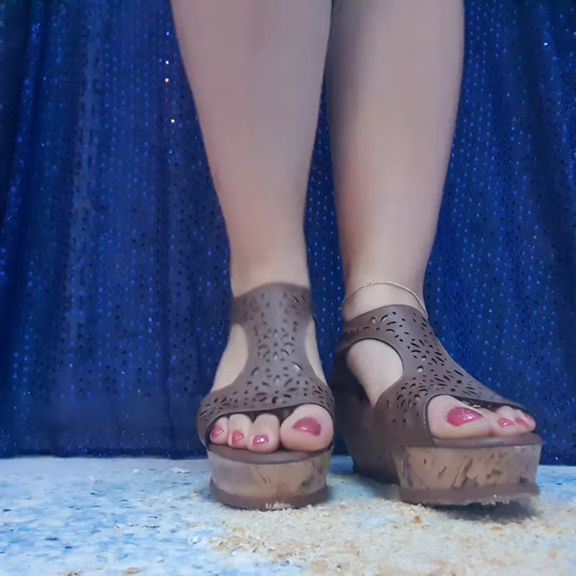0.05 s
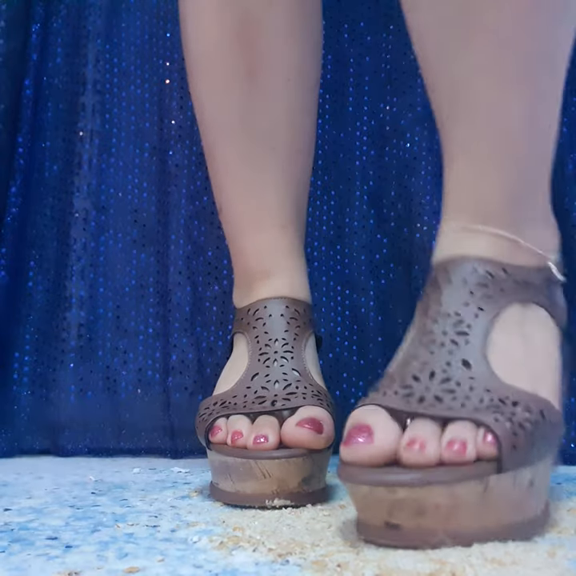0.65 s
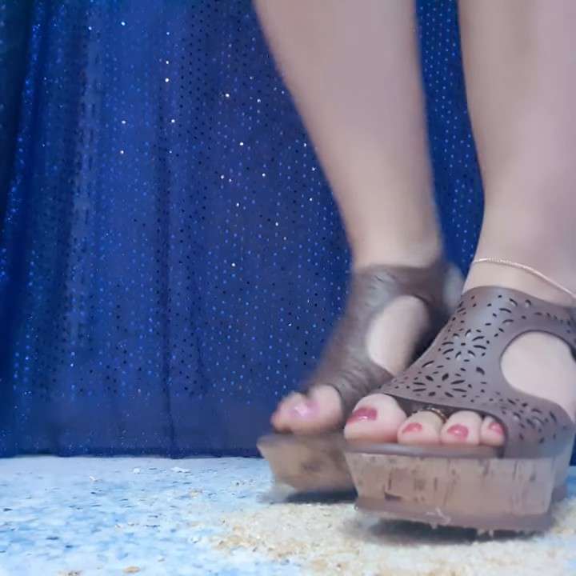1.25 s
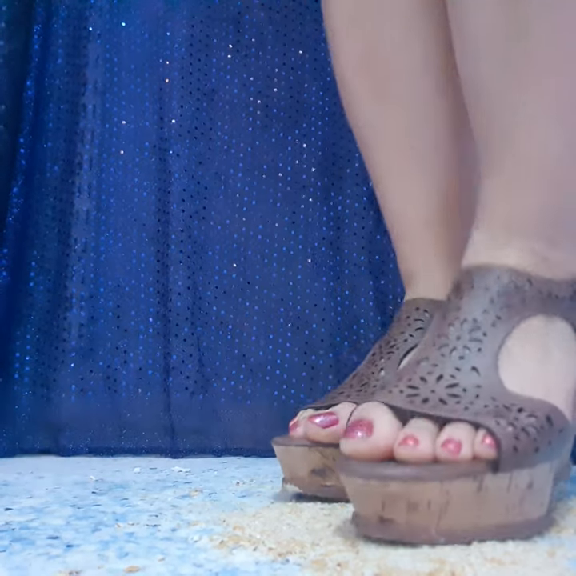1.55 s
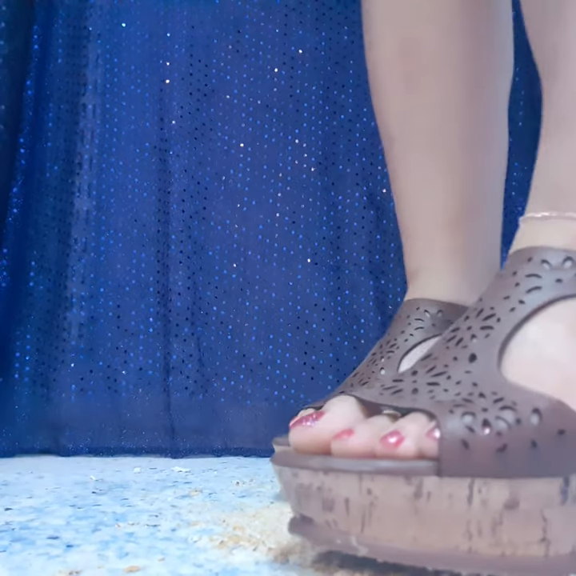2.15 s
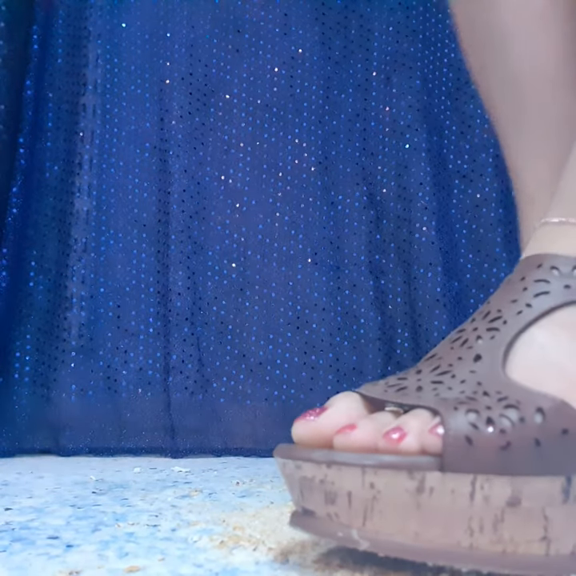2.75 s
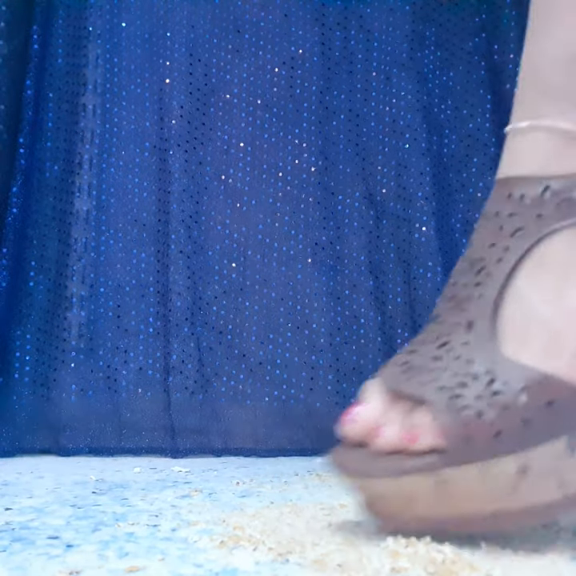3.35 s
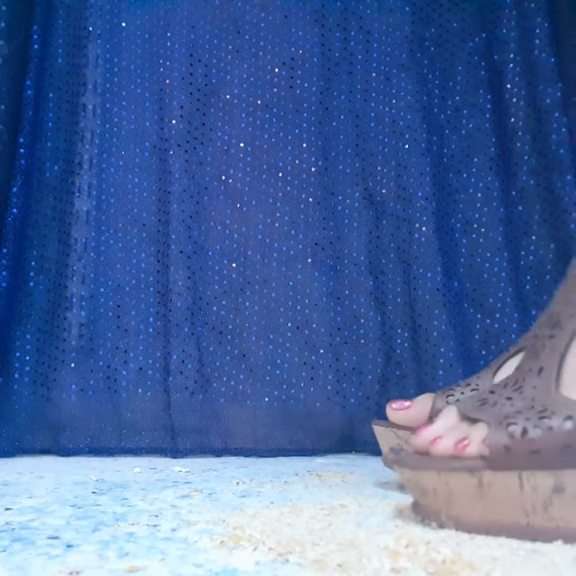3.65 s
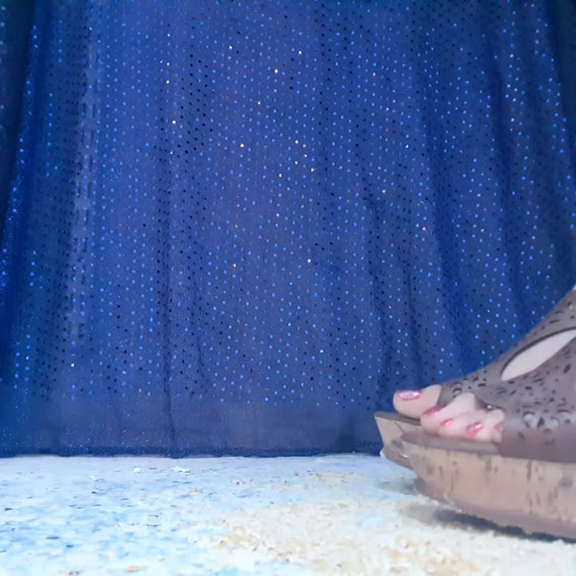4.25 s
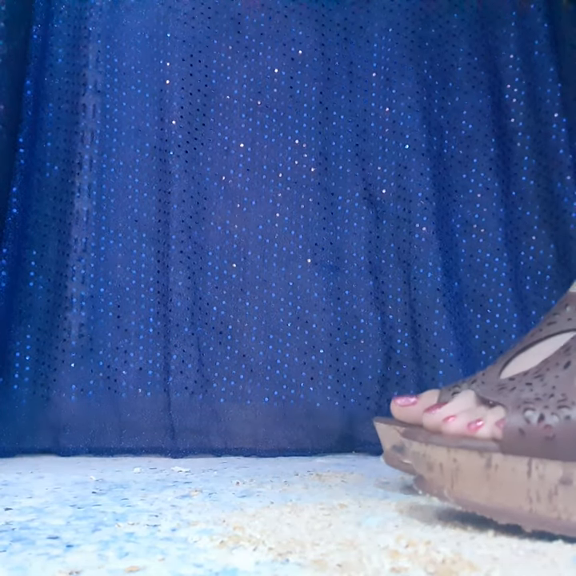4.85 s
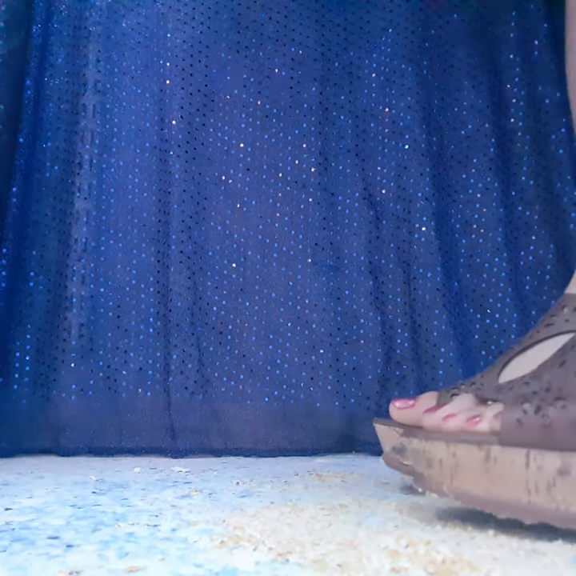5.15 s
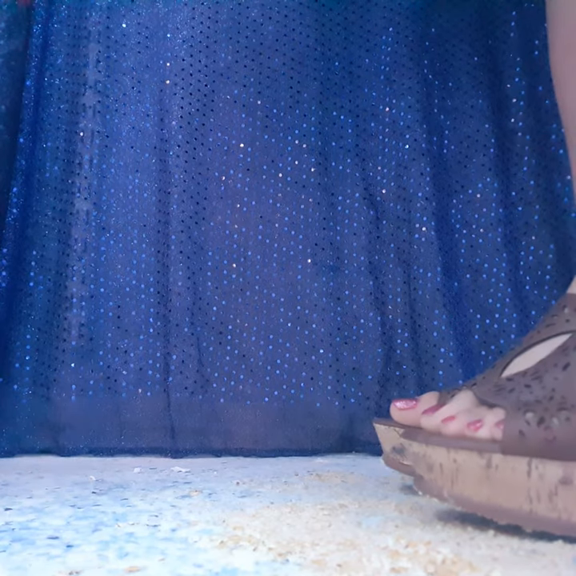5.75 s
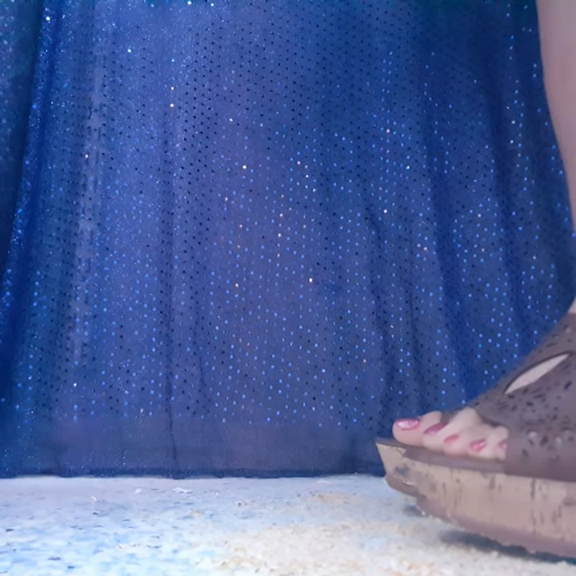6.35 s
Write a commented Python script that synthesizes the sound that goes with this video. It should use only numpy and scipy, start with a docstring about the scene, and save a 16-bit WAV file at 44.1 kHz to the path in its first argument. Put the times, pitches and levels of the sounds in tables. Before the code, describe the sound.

Brittle snack pieces crackle and snap in uneven bursts as thick sandal soles press down on them, close to the microphone in a small room. The crunching thins into a powdery grinding and a few quiet scrapes and taps. Something then brushes the microphone on the left and knocks it with one loud, hollow thump. A faint, low motor hum continues underneath.

```python
"""Dry pretzel pieces scrape and crunch under wedge sandals on a hard floor, close by, in a small
curtained room. Each step lands with a soft thud, crushes a mass of crumbs (thousands of tiny clicks)
and snaps a few larger pieces; then one sole grinds slowly and shuffles to rest.
Near the end something brushes and bumps the left side of the microphone, making its housing boom.
A motor somewhere in the house hums low underneath it all."""
import sys
import numpy as np
from scipy import signal
from scipy.fft import rfft, irfft, next_fast_len
from scipy.io import wavfile

SR = 44100
rng = np.random.default_rng(int(sys.argv[2]) if len(sys.argv) > 2 else 0)


def waveform_to_disk(signal):
    """Save audio, clipped to [-1, 1], as 16-bit WAV at the path in sys.argv[1]."""
    frames = np.transpose(np.atleast_2d(signal))
    scaled = np.clip(frames, -1, 1) * 32767
    samples = np.round(scaled).astype(np.int16)
    wavfile.write(sys.argv[1], SR, samples)


N = 282416
T = np.arange(N) / SR

# weight bearing down on the crumbs: t/s at full weight, level/dB, rise/s, hold/s, release/(dB per s),
# hollow share/dB, fizz share/dB
PRESSES = [(.01, -43, .05, 0.028, 99, -0.5, -4.5), (0.067, -29, 0.035, 0.016, 165, -3, -6.5),
           (0.236, -38, 0.16, 0.04, 108, -5.5, -3), (0.702, -32, 0.083, 0.3, 82, -8.5, -9),
           (.91, -43.5, 0.045, 0.067, 82, -7, -0.5), (1.017, -53, .04, 0.27, 66.5, 2, 6),
           (1.375, -36, 0.063, 0.011, 137, -2.5, -7.5), (1.537, -39, 0.25, 0.059, 116.5, -2.5, -6),
           (1.912, -35.5, 0.08, 0.091, 123, -4, -8), (2.12, -43.5, 0.19, 0.078, 95, -6.5, -4.5),
           (2.263, -40.5, 0.076, 0.091, 147, 0, 0.5), (2.722, -37.5, 0.052, .02, 60, -4, -3.5),
           (3.01, -43, 0.23, 0.018, 89, -4.5, -1.5), (3.194, -31.5, 0.082, 0.0032, 258, -6, -6.5),
           (3.29, -35.5, 0.07, 0.0064, 200, -2.5, -5.5), (3.66, -29, 0.11, 0.011, 156, -8, -5),
           (3.783, -35, 0.098, 0.057, 167, -6.5, -2.5), (3.954, -41.5, 0.091, 0.0093, 133, -4, -4),
           (4.046, -38, 0.033, 0.0077, 175, -3.5, -0.5), (4.164, -49.5, 0.15, 0.027, 85, 0, 1),
           (4.4, -48, 0.54, 0.075, 48, -15, -2.5), (4.59, -48, 0.58, 0.03, 32, -16.5, -2),
           (4.889, -54, 0.018, .02, 82, 1, -2), (5.112, -53, 0.26, 0.05, 90, -4.5, -2),
           (5.717, -68, 0.2, 0.025, 130, 0, 3)]
# tone of breaking crumbs: f/Hz, level/dB
CRUMB_COLOUR = [(88, -37), (150, -3.5), (249, -6), (315, -6), (422, -2.5), (745, -2.5), (854, -1.5),
                (1060, -5), (1870, -5), (3220, -5.5), (6260, -13), (7600, -15.5), (10200, -17.5),
                (12900, -16), (16000, -19.5)]
# dust hiss compared with the clicks, as the pieces are ground to powder: t/s, level/dB
DUST_SHARE = [(0, -8), (4.08, -8), (4.3, 5), (4.8, 4.5), (5.05, -2.5)]
# the largest pieces snapping: t/s, level/dB, body f/Hz, crust f/Hz, crust share/dB, left minus right/dB
BIG_SNAPS = [(0.056, -18.5, 2580, 6000, -10, 6), (0.0705, -10, 1710, 6000, 6, 0),
             (0.082, -16, 1710, 10500, -25, 5), (0.206, -24, 3400, 6000, 6, 4),
             (0.246, -16.5, 3400, 5200, -5, 6), (0.277, -20, 2800, 4500, -6, 2.5),
             (0.641, -21, 800, 5900, 23, 5), (0.696, -14.5, 2580, 5900, -1, 3),
             (0.7013, -14.5, 3400, 7000, -2, -2), (0.7075, -7.5, 2740, 5140, -6, -1),
             (0.7346, -7.0, 3370, 4500, -13, 1), (0.7572, -8, 2380, 4500, -7, 0),
             (0.7583, -14, 2100, 4500, -16, 3), (0.8553, -20.5, 3400, 4500, 4, 2),
             (0.8647, -15, 2580, 5200, -7, 0), (0.9105, -15, 3400, 4500, 10, 7),
             (1.0273, -19, 3400, 6100, 10, 0), (1.1638, -26.5, 2770, 5340, 17, -1),
             (1.309, -17.5, 2080, 6000, -6, 3), (1.3635, -28.0, 2410, 4500, 10, 6),
             (1.5097, -19.5, 3170, 10500, -4, 3), (1.5405, -26.5, 3400, 10500, -15, -0.5),
             (1.623, -18.5, 2580, 4500, 5, 4), (1.8727, -16.5, 2410, 6000, 0, 4),
             (1.922, -20, 3400, 5200, -2, 1.5), (1.9356, -4.5, 2800, 4500, -19, 3.5),
             (1.9404, -19.5, 3150, 7000, -3.5, 0), (2.0459, -21.5, 2240, 4470, -8, 5),
             (2.1264, -22.5, 3380, 7000, -7, 4), (2.1483, -17, 3400, 7000, -2, 1),
             (2.2553, -17, 1830, 6000, 5, 6), (2.2657, -10.5, 1830, 6950, 8, -5),
             (2.2963, -9.5, 1790, 4600, -1.5, 3.5), (2.3472, -14, 2250, 6000, 2.5, 1),
             (2.671, -25, 3400, 10600, 6, -1), (2.7341, -14.5, 910, 4440, 1, 6),
             (2.8438, -30, 1960, 8500, -12.5, 7), (3.1474, -17, 2360, 4450, -0.5, 5.5),
             (3.1913, -5.5, 2250, 5200, -0.5, 2), (3.1921, -12.5, 2070, 4470, -5, 1.5),
             (3.195, -5, 2370, 4500, 3.5, 2.5), (3.211, -15.5, 2250, 6000, 0, 0.5),
             (3.263, -15.5, 3420, 7000, -5.5, 1), (3.6204, -21, 2960, 6000, 7, -1),
             (3.6363, -11.5, 2560, 6000, 1.5, -3), (3.6534, 0.5, 2430, 5200, 4, 0),
             (3.6579, -9, 2740, 5200, 3, -3), (3.7761, -9.5, 2740, 6000, 3, -1),
             (3.7901, -27, 3400, 7000, 0, 8), (3.8096, -15.5, 2550, 4580, -1, -6),
             (3.8277, -16.5, 1710, 5230, 4, -6), (4.0436, -12.5, 800, 5900, 22, -8),
             (4.0541, -16.5, 3170, 5940, -1, 2), (4.0602, -9.5, 1570, 4500, 5, 0),
             (4.1646, -13.5, 1460, 7100, 5.5, -2.5), (4.805, -28.5, 2100, 7000, 12, -3),
             (5.0336, -35, 2100, 4500, -3, 8), (5.096, -19.5, 1470, 5100, -1, 2.5)]
# soles landing: t/s, thud level/dB, crushing level/dB
FOOTFALLS = [(.638, -28, -38), (1.306, -33, -38), (1.868, -24.5, -39.5), (2.669, -31.5, -42),
             (3.138, -38, -40.5), (3.263, -39.5, -51.5), (3.526, -41.5, -45.5)]
# light taps as the sole settles: t/s, level/dB
SOLE_TAPS = [(5.786, -42), (5.818, -53), (6.02, -54), (6.136, -46), (6.162, -53)]
# tones of the sole hitting the floor: f/Hz, time to fade 60 dB/s, level/dB
SOLE_MODES = [(115, 0.0617, -6.5), (208.4, 0.066, 4.5), (261, 0.12, -2), (375, 0.04, -4), (630, 0.034, -20)]
# a sole dragging over grit: start t/s, end t/s, first f/Hz, last f/Hz, width/Hz, level/dB
SCRAPES = [(0.013, 0.203, 895, 920, 320, -44.5), (0.182, 0.357, 940, 920, 327, -45.5),
           (.3, 0.563, 500, 425, 303, -57.5), (0.993, 1.305, 1600, 1730, 380, -57.5),
           (1.327, 1.468, 843, 815, 110, -42), (1.45, 1.953, 790, 730, 300, -62.5),
           (2.22, 2.36, 6200, 5940, 1100, -43.5), (2.706, 3.173, 815, 1210, 298, -49.5),
           (2.81, 3.1, 2200, 2480, 380, -55), (3.214, 3.412, 575, 435, 220, -45),
           (4.035, 4.105, 5800, 5600, 1800, -42), (4.293, 4.546, 3600, 3200, 2170, -54.5),
           (4.494, 4.655, 2140, 1940, 398, -50.5), (4.883, 4.923, 3770, 4030, 1590, -44),
           (4.91, 4.99, 3930, 3630, 1700, -56.5), (4.89, 5.3, 840, 730, 436, -59),
           (5.532, 5.635, 3900, 3800, 2420, -69.5), (5.646, 5.814, 3930, 3600, 1690, -65.5),
           (5.548, 5.802, 795, 648, 301, -71.5), (5.56, 5.8, 1585, 1420, 401, -73),
           (5.718, 5.8, 592, 567, 70, -60.5), (5.882, 5.901, 5700, 5570, 1090, -70.5),
           (6.023, 6.17, 3800, 3700, 1493, -70.5), (5.783, 5.828, 403, 380, 121, -59),
           (5.865, 5.92, 423, 410, 100.3, -62), (6.13, 6.166, 408, 369, 200, -59.5)]
# knocks on the microphone: t/s, housing level/dB, mount level/dB, tick level/dB
BUMPS = [(6.2683, 3.5, -8, -15), (6.2778, -5, -8, -15.5), (6.295, -9.5, -19, -38), (6.308, -22, -38, -36.5)]
# tones of the microphone's housing: f/Hz, time to fade 60 dB/s, level/dB
HOUSING_MODES = [(132, 0.11, -10), (188, 0.046, 14), (278, 0.118, -4), (400, 0.053, -33), (493, .05, -15.5)]
# tones of the whole case rocking on its mount: f/Hz, time to fade 60 dB/s, level/dB
MOUNT_MODES = [(79, 0.084, 7), (118, 0.052, -10), (415, 0.063, -21)]
# tone of the rub on the housing: f/Hz, level/dB
BRUSH_COLOUR = [(60, -18), (220, 9), (800, -10), (4300, -5.5), (7000, -24), (15000, -26)]
# the motor's tones: f/Hz, level/dB
HUM_TONES = [(87.5, -49.5), (64.2, -65.5), (102, -60), (51.6, -70.5), (26.5, -81), (154, -81.5)]
# slow rise and fall of the hum: t/s, level/dB
HUM_SWELL = [(0, -2), (1.1, -2.5), (1.55, -10), (1.95, -2), (2.6, -4), (3.0, 0), (3.5, -2), (3.95, 3),
             (4.2, -7), (4.5, 2.5), (6.2, -0.5)]
# tone of the still room: f/Hz, level/dB
ROOM_COLOUR = [(20, -19.5), (40, -5), (60, 7), (130, -4), (300, -7), (500, -18.5), (1200, -29), (2300, -38),
               (3500, -33.5), (5500, -31), (7500, -40.5), (15000, -40.5)]


def crunch(gains, hollow_db=-1, crackle_db=-.5, low_width=0.65, left_db=1.25):
    """The weight on the sole sets how loud the crumbs are; coarse ones sound hollow, fine ones fizz."""
    hollow_gain, crackle_gain, fizz_gain = gains
    grains = colour(crumbs(), CRUMB_COLOUR)
    low = band(grains, 170, 1415, order=3)
    low = low.mean(0) + low_width * (low - low.mean(0))  # long waves reach both sides much alike
    hollow = hollow_gain * undb(hollow_db) * unit(low)
    crackle = crackle_gain * undb(crackle_db) * unit(band(grains, 1148, 4720, order=3))
    fizz = fizz_gain * unit(band(grains, 4690, 21000, order=3))
    return (hollow + crackle + fizz) * pan(left_db)


def crumbs(per_s=2800, spread_db=3.5, largest_db=16, ring_db=8, pitches=16):
    """Countless tiny breaks, most of them weak, over a hiss of dust; each crumb size has its own pitch."""
    clicks = 0
    for hz in np.geomspace(700, 12000, pitches):
        breaks = rng.random(N) < per_s / pitches / SR
        strength = undb(np.minimum(spread_db * rng.exponential(size=N), largest_db))
        kicks = breaks * strength * rng.choice([-1, 1], N)
        path = path_from_sole(scatter_db=-1)[:, :SR // 40]
        path = path + undb(ring_db) * band(path, hz / 1.023, hz * 1.113, order=1)
        clicks = clicks + signal.oaconvolve(kicks[None], path)[:, :N]
    dust = undb(np.interp(T, *np.transpose(DUST_SHARE)))
    hiss = unit(band(rng.standard_normal((2, N)), 200, 14000, order=1))
    return (unit(clicks) + dust * hiss) / np.sqrt(1 + dust ** 2)


def crushing(rest_db=-87.5, rise_db=30, sag_db_per_s=45.5):
    """Gains of hollow, crackle and fizz: each press builds, sags as crumbs give way, then lets go."""
    t = T[::20]
    landing = (0.0027, .015, 166, -3, -5)  # a landing is a quick press: last five columns of PRESSES
    landings = [(s, db, *landing) for s, _, db in FOOTFALLS]
    power = undb(rest_db) ** 2  # crumbs still settle under a resting foot
    for s, db, rise_s, hold_s, release_db_per_s, hollow_db, fizz_db in PRESSES + landings:
        age = t - s
        build = rise_db * np.minimum(age, 0) / rise_s
        sag = sag_db_per_s * np.clip(age, 0, hold_s)
        release = release_db_per_s * np.maximum(age - hold_s, 0)
        shares = undb([[hollow_db], [0], [fizz_db]])
        power = power + (shares * undb(db + build - sag - release)) ** 2
    return [np.interp(T, t, gain) for gain in np.sqrt(power)]


def snaps(pieces, gain_db=-1, splinters_per_s=900, splinter_db=-16, splinter_s=0.0043):
    """A piece breaks: its body springs back, its glazed crust cracks higher, and splinters follow."""
    out, t = np.zeros((2, N)), T[:SR // 20]
    for s, db, body_hz, crust_hz, crust_db, left_db in pieces:
        pulse = spring_back(body_hz) + undb(crust_db) * spring_back(crust_hz)
        breaks = (rng.random(len(t)) < splinters_per_s / SR) * rng.standard_normal(len(t))
        breaks *= undb(splinter_db) * np.exp(-t / splinter_s)
        breaks[0] = 1  # the main break
        cracks = signal.fftconvolve(pulse / np.abs(pulse).max(), breaks)
        path = path_from_sole(scatter_db=-6, fade_s=0.017, dull_hz=3500, lag_samples=4)
        snap = band(signal.fftconvolve(cracks[None], path), 350, 24000, order=1)
        add(out, s, snap * undb(db + gain_db) * pan(left_db))
    return out


def small_snaps(crackle_gain, count=90, powder_s=4.25, over_db=15, spread_db=2.5, largest_db=-23):
    """Rows like BIG_SNAPS: small pieces break at random, louder under weight, until only powder is left."""
    at = (rng.random(count) * powder_s * SR).astype(int)
    size, body, crust, share, side = rng.standard_normal((count, 5)).T
    db = np.minimum(20 * np.log10(crackle_gain[at]) + over_db + spread_db * size, largest_db)
    body_hz, crust_hz = 2300 * 2 ** (body / 3), 5800 * 2 ** (crust / 4)
    crust_db, left_db = 1 + 5 * share, 4 * side
    return list(zip(T[at], db, body_hz, crust_hz, crust_db, left_db))


def spring_back(hz, cycles=0.32):
    """A brittle piece springs back: it swings up and dies away within a cycle or two."""
    t = T[:SR // 100]
    swing = t * np.exp(-t * hz / cycles) * np.sin(2 * np.pi * hz * t)
    return swing / np.linalg.norm(swing)


def path_from_sole(scatter_db, fade_s=0.027, dull_hz=8000, lag_samples=6):
    """A click arrives directly, often on one side first, then as duller echoes off sole and floor."""
    path = band(echoes(fade_s, scatter_db), 200, dull_hz, order=1)
    path[[0, 1], rng.integers(0, lag_samples, size=2)] += 1
    return path


def thuds(gain_db=-3):
    """The thick sole thuds as it meets the floor, and taps it softly while settling."""
    out = np.zeros((2, N))
    for s, db, *_ in FOOTFALLS + SOLE_TAPS:
        add(out, s, undb(db + gain_db) * ring(SOLE_MODES))
    return out


def scrapes():
    """Grit rings the thin air gap under the sole; its pitch slides as the sole tilts."""
    out, catches = np.zeros((2, N)), grit()
    for start, end, first_hz, last_hz, width_hz, db in SCRAPES:
        drag = catches[:, int(start * SR):int(end * SR)]
        progress = np.linspace(0, 1, drag.shape[1])
        glide = np.exp(2j * np.pi * np.cumsum(first_hz + (last_hz - first_hz) * progress) / SR)
        lowpass = signal.butter(2, width_hz / 2, fs=SR, output="sos")
        gap = signal.sosfilt(lowpass, drag / glide) * glide  # keeps a band around the sliding pitch
        add(out, start, undb(db) * unit(gap.real) * np.sin(np.pi * progress))
    return out


def grit(per_s=1500, spread_db=3, jerk_db=3):
    """A sole slides in jerks, catching on grit with tiny clicks."""
    catches = (rng.random((3, N)) < per_s / SR) * rng.standard_normal((3, N))  # left, right, shared
    catches *= undb(spread_db * rng.standard_normal((3, N)))
    jerks = undb(jerk_db * unit(band(rng.standard_normal(N), 27, 90)))
    return (catches[:2] + catches[2]) * jerks


def bump(contact_s=0.0012, tick_s=0.00043, rub_db=-15, rub_s=.008, right_tick_db=-14, bright_db=-22):
    """A padded knock and its rebounds: the housing booms on the left, the case rocks on its mount."""
    out, t = np.zeros((2, N)), T[:SR // 2]
    push = np.sin(np.pi * t[t < contact_s] / contact_s)
    housing, mount = (band(np.convolve(ring(modes), -push / push.sum())[:len(t)], 65, 3000)
                      for modes in (HOUSING_MODES, MOUNT_MODES))
    contact = np.exp(-t / tick_s) + undb(rub_db) * np.exp(-t / rub_s)
    sides = undb([[0], [right_tick_db]])
    for s, housing_db, mount_db, tick_db in BUMPS:
        rocking = undb(mount_db) * mount  # pushes the two sides opposite ways
        thud = np.array([undb(housing_db) * housing - rocking / 2, rocking])
        noise = rng.standard_normal(len(t))
        tick = contact * (unit(band(noise, 310, 3270)) + undb(bright_db) * noise)
        add(out, s, thud + sides * undb(tick_db) * tick)
    return out


def brush(start_s=6.224, rise_s=0.018, db=-35, right_db=-12):
    """A short rub on the left of the housing swells and dies away just before the knock."""
    age = np.maximum(T - start_s, 0) / rise_s
    rub = unit(colour(rng.standard_normal((2, N)), BRUSH_COLOUR))
    return rub * undb([[db], [db + right_db]]) * age ** 2 * np.exp(1 - age ** 2)


def motor_hum(rumble_db=-61, waver_db=1):
    """A motor somewhere in the house hums, wavers and slowly swells."""
    waver = waver_db * unit(band(rng.standard_normal(N), 0.41, 3))
    swell = undb(waver + np.interp(T, *np.transpose(HUM_SWELL)))
    tones = sum(np.sqrt(2) * undb(db) * np.sin(2 * np.pi * (hz * T + rng.random()))
                for hz, db in HUM_TONES)
    rumble = undb(rumble_db) * unit(band(rng.standard_normal(N), 68, 88, order=3))
    return (tones + rumble) * swell


def room_noise(db=-61, width=0.76):
    """The faint, low rush of a still room, partly shared by both sides."""
    noise = rng.standard_normal(N) + width * rng.standard_normal((2, N))
    return undb(db) * unit(colour(noise, ROOM_COLOUR))


def echoes(fade_s, db):
    """A wash of echoes, different left and right, that drops 60 dB in fade_s; db is its total energy."""
    t = T[:int(fade_s * SR)]
    wash = rng.standard_normal((2, len(t))) * np.exp(-np.log(1000) * t / fade_s)
    wash *= 1 - np.exp(-t / 0.0018)  # soft start
    return undb(db) * wash / np.sqrt(np.sum(wash ** 2) / 2)


def ring(modes):
    """The fading tones of an object struck once, scaled to peak at 1."""
    t = T[:SR // 2]
    tones = sum(undb(db) * np.sin(2 * np.pi * hz * t) * np.exp(-np.log(1000) * t / fade_s)
                for hz, fade_s, db in modes)
    return tones / np.abs(tones).max()


def colour(x, points):
    """Shape the tone along (f/Hz, level/dB) points while clicks keep their sharp start."""
    hz, db = np.transpose(points)
    size = 2 * next_fast_len(N)
    log_hz = np.log(np.maximum(np.fft.rfftfreq(size, 1 / SR), 1))
    cepstrum = irfft(np.log(undb(np.interp(log_hz, np.log(hz), db))))
    cepstrum[1:size // 2] *= 2  # move all ringing to after the click
    cepstrum[size // 2:] = 0
    return irfft(rfft(x, size) * np.exp(rfft(cepstrum)), size)[..., :N]


def band(x, lo_hz, hi_hz, order=2):
    """Keep the frequencies between lo_hz and hi_hz."""
    edges = [lo_hz, min(hi_hz, SR / 2 - 1)]
    return signal.sosfilt(signal.butter(order, edges, "band", fs=SR, output="sos"), x)


def pan(left_db):
    """Two gains that make the left side left_db louder than the right."""
    return undb(np.array([[left_db], [-left_db]]) / 2)


def undb(db):
    """Turn decibels into a gain to multiply by."""
    return 10 ** (np.asarray(db) / 20)


def unit(x):
    """Scale to an average (rms) level of 1."""
    return x / np.sqrt(np.mean(x ** 2))


def add(out, s, sound):
    """Mix a sound in from time s."""
    i = int(s * SR)
    out[:, i:i + sound.shape[-1]] += sound[..., :N - i]


def scene(feet_room_db=-9, bump_room_db=-36):
    """Feet on crumbs and the bump, with the room's short, dull echo, over the hum."""
    gains = crushing()
    feet = crunch(gains) + snaps(BIG_SNAPS + small_snaps(gains[1])) + scrapes() + thuds()
    knock = brush() + bump()
    into_room = undb(feet_room_db) * feet + undb(bump_room_db) * knock
    echo = signal.fftconvolve(into_room, echoes(fade_s=0.44, db=3), axes=1)[:, :N]
    return feet + knock + band(echo, 84, 3900, order=1) + motor_hum() + room_noise()


def record(dry, top_hz=15800):
    """Clip any peaks beyond full scale and cut the highest treble."""
    lowpass = signal.ellip(8, .2, 70, top_hz, fs=SR, output="sos")
    return signal.sosfilt(lowpass, np.clip(dry, -1, 1))


dry = scene()
out = record(dry)
waveform_to_disk(out)
```